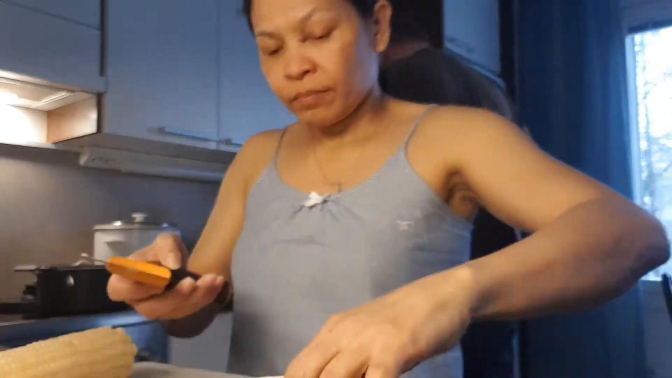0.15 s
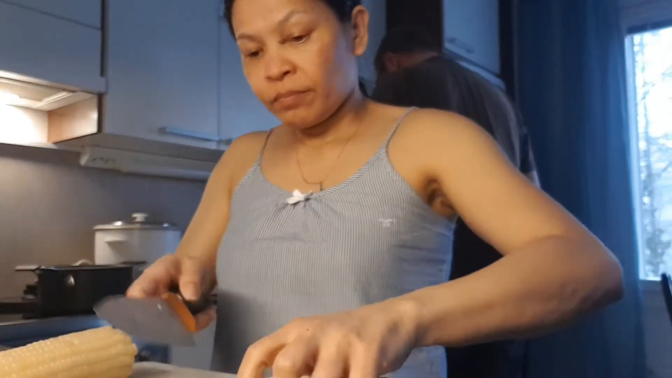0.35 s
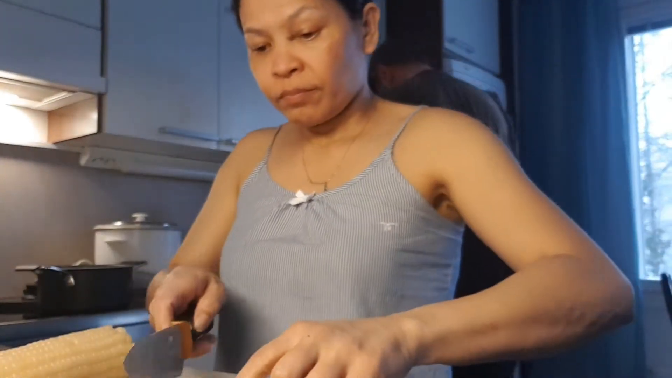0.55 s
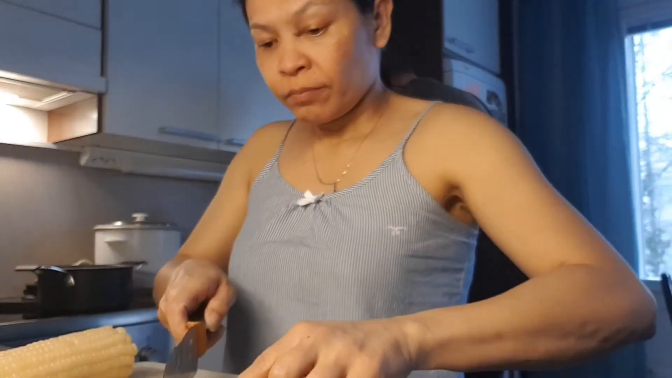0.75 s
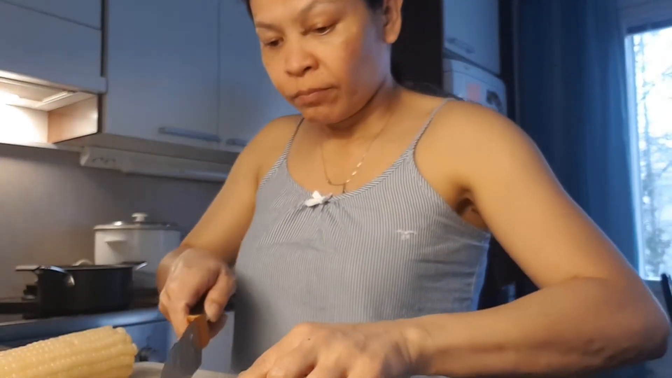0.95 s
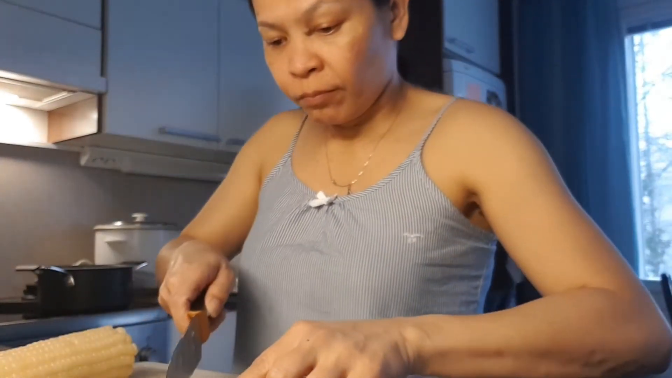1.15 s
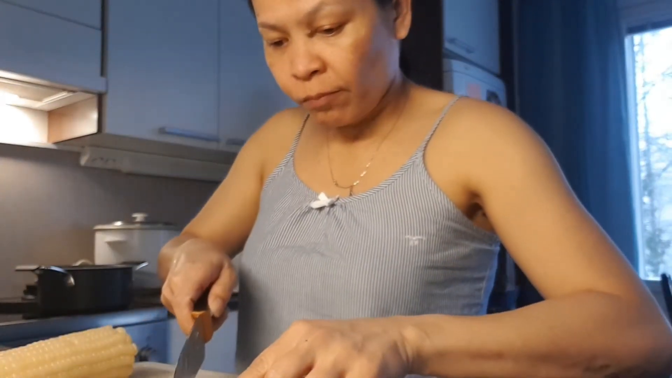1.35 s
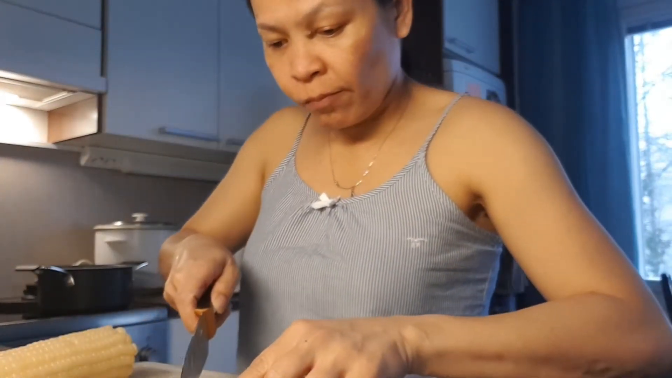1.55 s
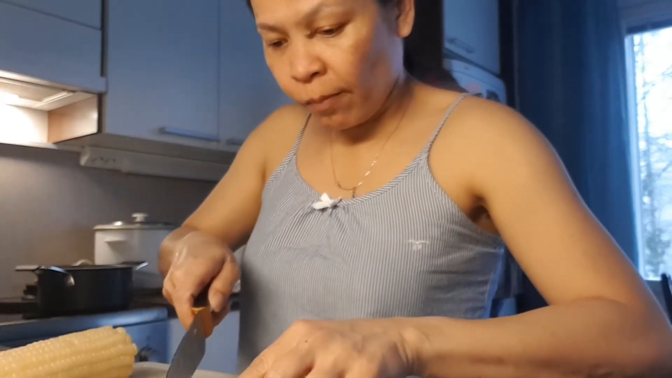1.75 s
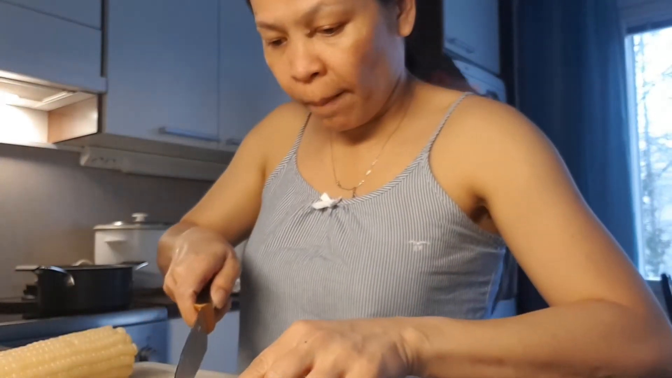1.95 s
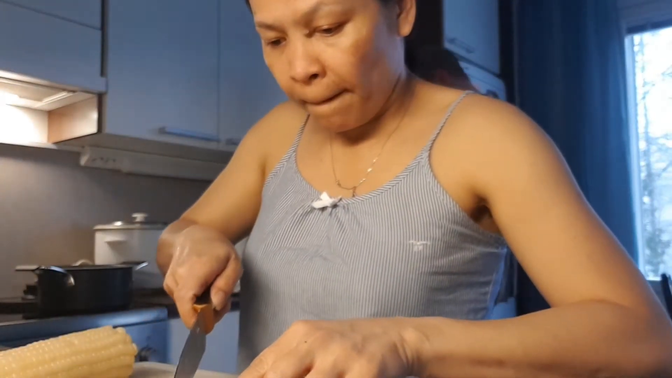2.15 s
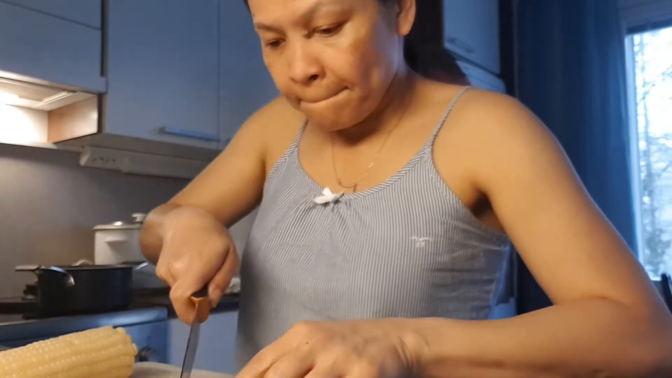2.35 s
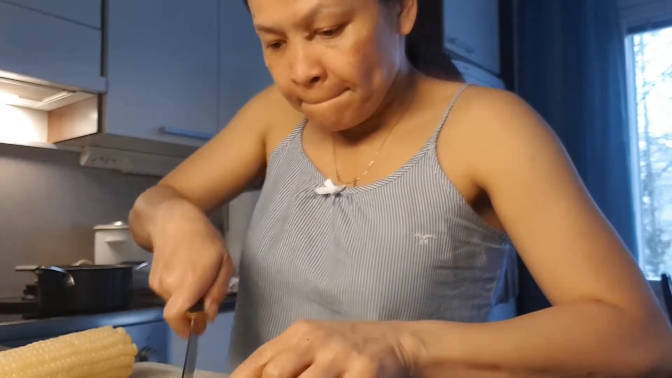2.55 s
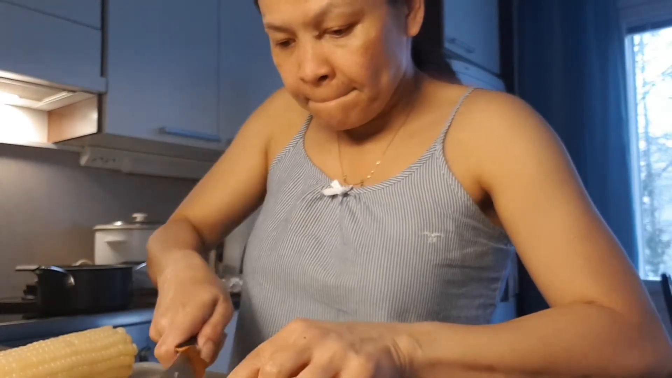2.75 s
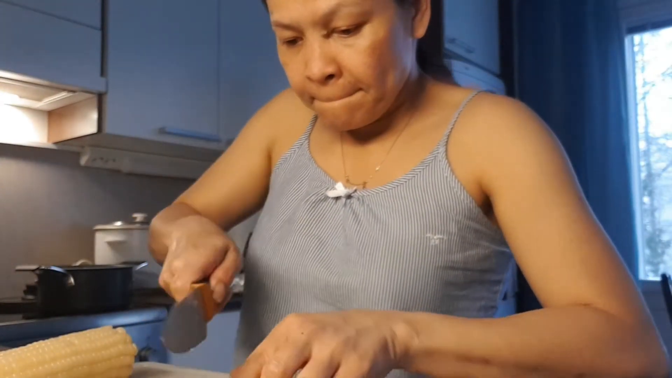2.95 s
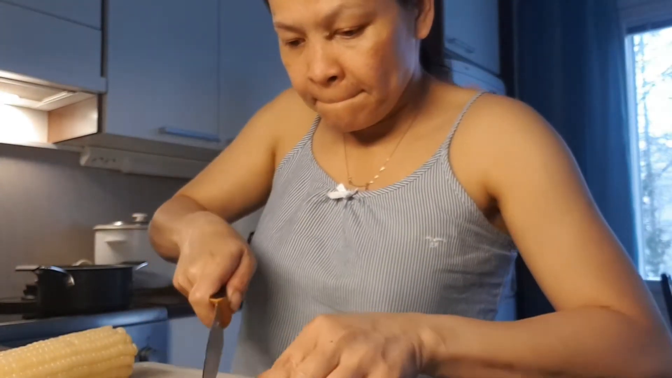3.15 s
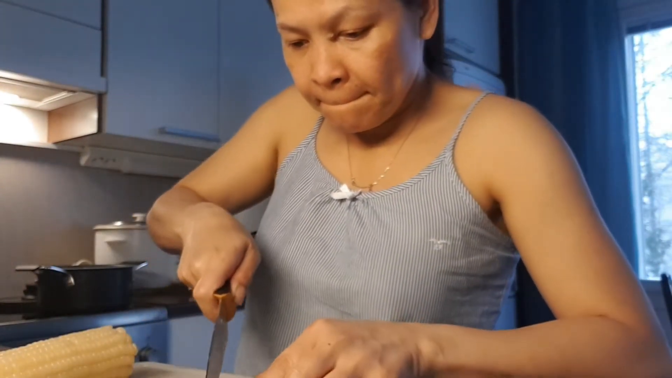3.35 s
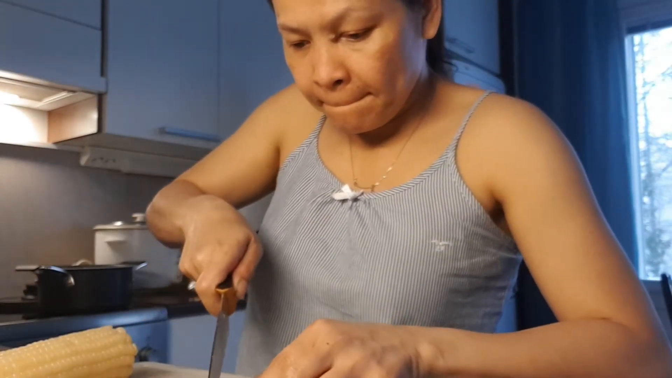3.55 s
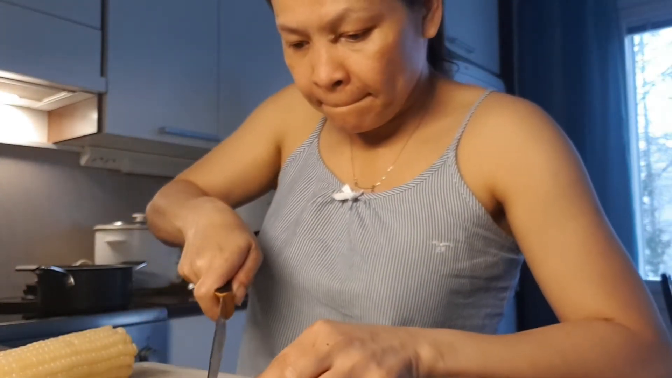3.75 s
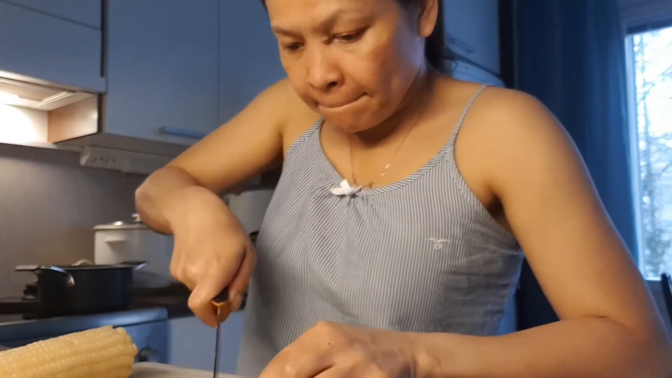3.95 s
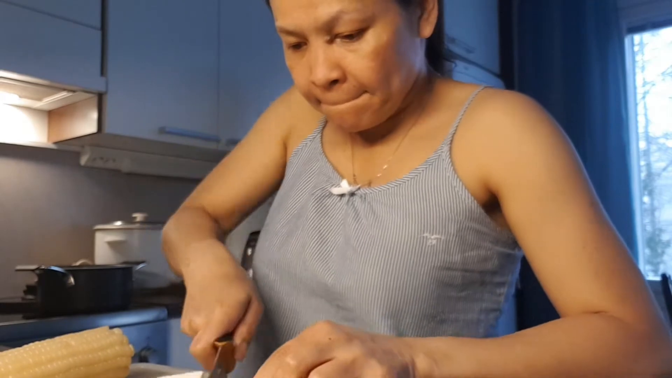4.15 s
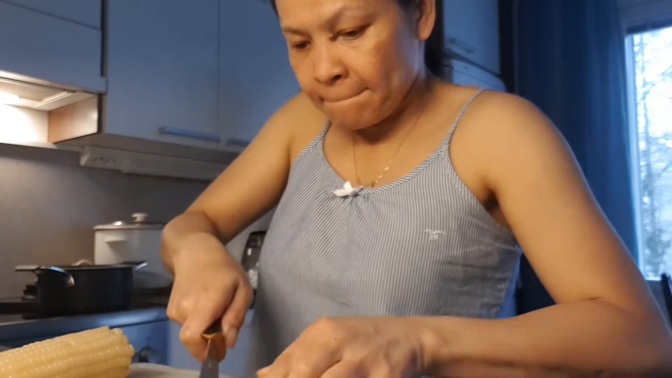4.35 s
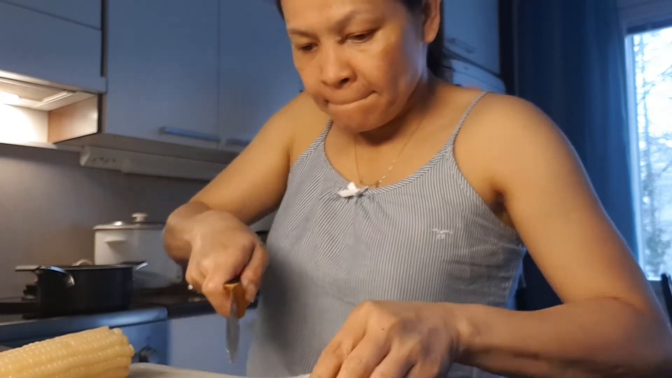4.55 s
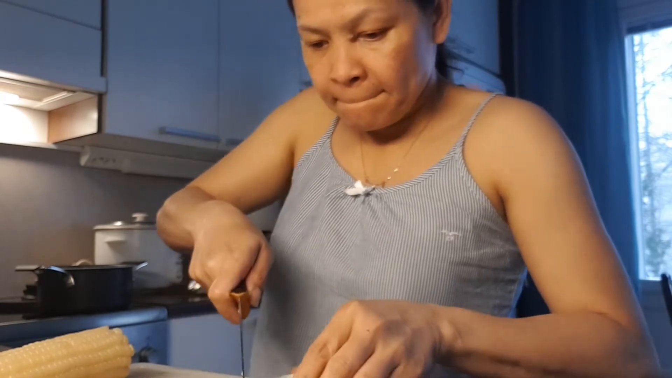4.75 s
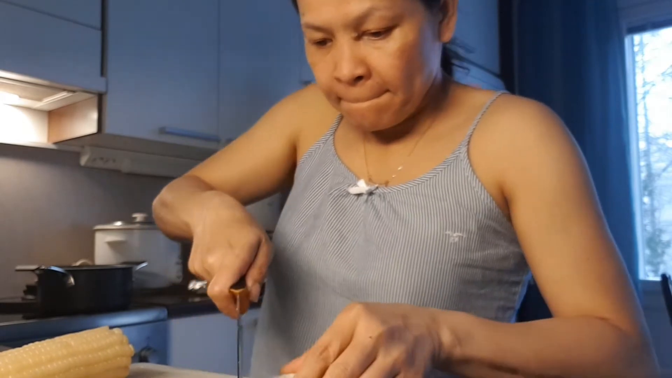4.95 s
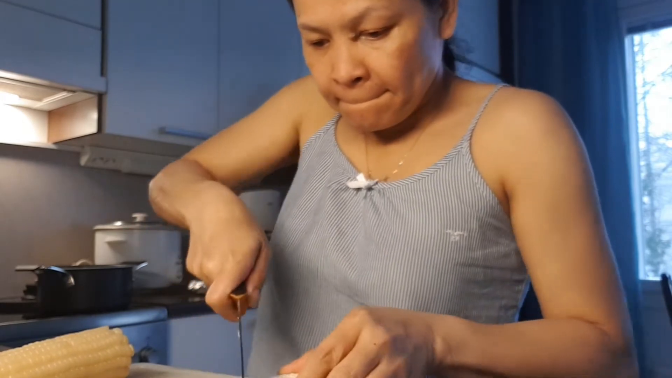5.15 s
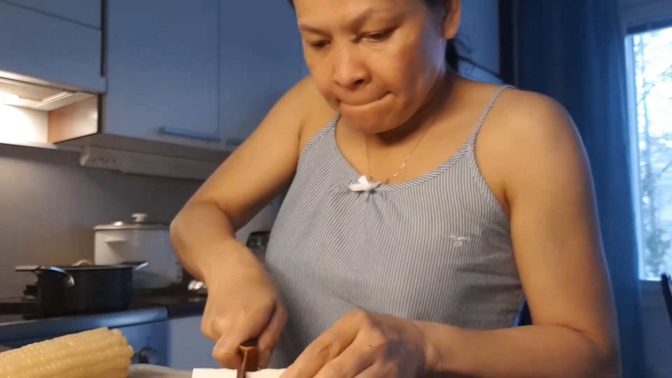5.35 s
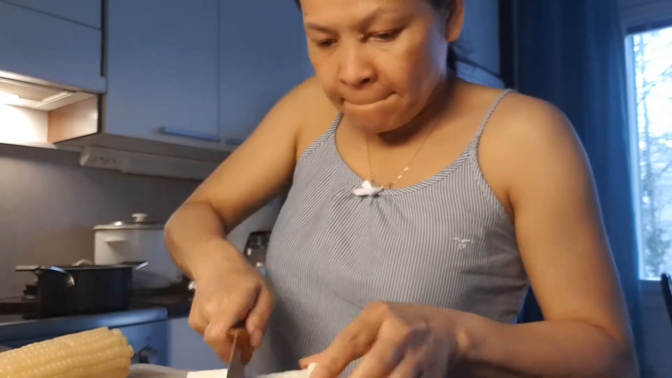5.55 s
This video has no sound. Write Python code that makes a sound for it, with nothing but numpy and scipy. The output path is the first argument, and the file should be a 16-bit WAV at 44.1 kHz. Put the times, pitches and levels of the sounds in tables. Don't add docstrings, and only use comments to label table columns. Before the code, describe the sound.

Close, dry kitchen cutting: light taps and soft worktop thuds, then rasping fibre-tearing strokes swelling and fading irregularly. The blade breaks through and cracks on the wooden board, saws harder, then breaks through again with a rattling burst of knocks. Near silence with faint brushing follows, then one last chop. A small room echoes briefly; an appliance hums beneath.

```python
import sys
import numpy as np
from scipy import signal
from scipy.fft import rfft, irfft, next_fast_len
from scipy.io import wavfile
from scipy.ndimage import uniform_filter1d

SR = 44100
rng = np.random.default_rng(int(sys.argv[2]) if len(sys.argv) > 2 else 0)


def gain_from_decibels(decibels):
    exponent = np.asarray(decibels, float) / 20
    return 10 ** exponent


def persist_wave(psi):
    counts = np.round(np.clip(psi, -1, 1) * 32767).astype(np.int16)
    wavfile.write(sys.argv[1], SR, np.atleast_2d(counts).T)


N = 250796

# (start [s], swell [s], fade [s], edge hiss [dB], root body share [dB])
STROKES = [(.632, .02, .03, -53, 4), (.643, 0.03, 0.51, -45, 5.5), (.785, 0.021, 0.026, -35.5, -9),
           (.8, 0.043, 0.13, -44, -6), (1.025, 0.025, 0.25, -46.5, -9), (1.185, 0.037, 0.05, -44, -2),
           (1.3, 0.055, 0.21, -60, 7.5), (1.371, 0.002, 0.068, -49, -11), (1.41, 0.0066, 0.079, -46, -9),
           (1.604, .002, .02, -55, -8), (1.602, 0.055, 0.12, -53.5, -14), (1.748, 0.0082, 0.1, -49, 1),
           (1.84, 0.071, 0.15, -42.5, -2.5), (1.93, 0.065, 0.12, -44, 0.5),
           (2.146, 0.0067, 0.043, -54.5, -4), (2.182, 0.0033, 0.076, -52, -8),
           (2.317, 0.012, 0.1, -58, 1.5), (2.36, 0.0065, 0.051, -58.5, -1), (2.42, 0.005, 0.09, -55.5, 0),
           (2.446, .002, .035, -46, 0), (2.446, 0.13, 0.16, -37.5, -1), (2.62, 0.059, 0.3, -41, -1),
           (2.75, 0.069, 0.091, -40, -2), (2.97, 0.049, 0.066, -49.5, -4), (3.13, 0.09, 0.42, -50.5, -2.5),
           (3.29, 0.024, 0.23, -47, -2), (3.46, 0.041, 0.14, -41.5, 0), (3.5, 0.061, 0.079, -41, -5),
           (3.63, 0.074, 0.19, -40.5, 0), (3.8, 0.13, 0.12, -37.5, -0.5)]
# (start [s], swell [s], fade [s], edge hiss [dB], body share [dB])
BRUSHES = [(0, 0.0032, 0.37, -77.5, 10), (.1, 0.022, 0.11, -72, 13), (.19, 0.063, 0.16, -66.5, 4),
           (.34, 0.053, 0.16, -67, 2), (.55, 0.014, 0.25, -75, 21), (1.51, 0.032, 0.17, -63.5, -15),
           (2.598, 0.017, 0.0052, -30, 10), (4.108, .012, 0.033, -55, -13), (4.055, 0.0081, .015, -54, 6),
           (4.122, 0.0068, 0.013, -49, -12), (4.132, 0.0019, 0.022, -33, 1.5),
           (4.143, 0.006, 0.004, -32, 4), (4.163, .004, 0.045, -48, 4), (4.195, .005, 0.031, -49, -4),
           (4.219, 0.028, 0.26, -59.5, 8.5), (4.51, 0.018, 0.039, -67, -11),
           (4.575, 0.048, 0.038, -69, -15.5), (4.69, 0.051, 0.049, -79.5, -9),
           (4.775, 0.016, 0.066, -76.5, -15.5), (4.869, 0.06, 0.042, -79, -10.5),
           (4.9, 0.075, .3, -90.5, 2), (5.12, .01, .03, -89, 6.5), (5.18, 0.007, 0.019, -66.5, -0.5),
           (5.202, 0.0021, 0.014, -64.5, -1), (5.22, .01, 0.097, -85.5, -2), (5.284, .004, 0.0095, -67, -2),
           (5.292, .002, 0.013, -56, 0), (5.3, 0.0033, 0.0057, -49, 3), (5.309, 0.008, 0.0027, -36, -5),
           (5.319, .002, 0.0035, -33.5, 9), (5.33, 0.0091, 0.14, -69.5, -1),
           (5.565, 0.017, 0.055, -85.5, 17)]
# (frequency [Hz], density [dB per Hz])
FIBRE_SPECTRUM = [(180, -40.5), (300, -18.5), (510, -3.5), (573, -12), (759, -10.5), (825, -8.5),
                  (1210, -8), (1740, -5), (2310, -6), (4480, -2.5), (6670, -5), (8700, -11.5), (12900, -6),
                  (15800, -13.5)]
# (time [s], peak [dB], room share [dB], brightness [dB per octave], left-right [dB])
KNOCKS = [(2.612, 0, -11.5, -2, 0), (2.6198, -10, -3.5, -2.5, 6), (2.629, -14, -10.5, -8.5, -2),
          (4.159, 2.5, -3.5, 2, 3), (4.163, -18, -7, 1, 0), (4.17, -9, -6.5, -2, 4.5),
          (4.177, -3, -1, 1.5, 8), (4.181, -9.5, -7.5, 4, 0), (4.185, -3.5, -8.5, -4, 9.5),
          (4.191, -11, -2, -4, -1.5), (4.197, -11, 0.5, 2, 3), (5.3195, -2, -11, 5, -1),
          (5.323, -12, -11, -1, -1), (5.328, -22.5, -4.5, 2, 3), (5.354, -25.5, -9, -1, 0)]
# (frequency [Hz], t60 [s], first spot [dB], second spot [dB], third spot [dB])
BOARD_MODES = [(478.6, 0.03, -14, -12.5, -15), (840, .04, -9, -12, -16), (1100, .035, -23, -11, -15),
               (1275, .025, -2.5, -9, -16), (1445, .045, 2, -1, 0.5), (1732, .017, -16, -3, -3),
               (2081, .02, -9, -6, -24), (2480, 0.0088, -17.5, -6.5, -20.5), (2797, .01, -7.5, -6.5, -4),
               (3350, .008, -6, -10, -22), (3883, .008, -11.5, -17.5, -15),
               (4680, 0.0037, -21.5, -22.5, -31.5), (5340, 0.0035, -22, -24, -15.5),
               (6240, 0.0043, -21.5, -22, -23.5)]
SPOT_ENDS_S = [3, 5]
# (frequency [Hz], lead [rad])
EAR_LEAD = [(490, -2.5), (830, -1.1), (1100, -1.7), (1300, 0.6), (1765, 0.2), (2200, 3), (2830, 0.5),
            (3500, -0.35)]
# (time [s], peak [dB], pitch [Hz], left-right [dB])
TICKS = [(0.094, -39.5, 1790, 9), (0.1196, -29.5, 1840, 9.5), (0.136, -41, 2600, 1), (0.145, -36, 1770, 10),
         (0.158, -30, 1690, 2), (0.2983, -41, 991, 12), (0.1198, -35, 850, 6), (0.154, -38, 850, 2),
         (0.562, -47, 1900, 5), (0.568, -42, 1000, 4), (0.578, -44, 1430, 6), (0.799, -18.5, 3350, 5),
         (1.222, -32.5, 4240, 21), (1.3717, -33, 6100, 9), (1.413, -41, 3430, 11), (1.605, -40, 6070, 9),
         (1.6447, -32, 1100, -9), (2.523, -29.5, 3240, 10.5), (4.0778, -24, 1502, 5.5),
         (4.1116, -21, 3510, 5), (4.5997, -55, 1660, -3), (4.6244, -66.5, 3200, -4),
         (5.188, -49.5, 3510, -3.5), (5.205, -46, 3010, -1)]
# (time
# [s], peak [dB], pitch [Hz], left-right [dB], t60 [s])
PATS = [(0.298, -35, 400, -3, 0.1), (2.614, -21.5, 325, -1.5, 0.15), (0.59, -33, 330, 2.5, 0.04),
        (0.784, -25.5, 520, -1.5, 0.048), (1.645, -29, 430, -5, 0.055), (1.654, -33, 320, -4, 0.053),
        (1.6445, -29, 760, 5, 0.09), (1.6455, -28.5, 1400, 6, 0.11), (1.663, -32, 1600, 6, 0.064),
        (1.676, -34, 2700, 4, 0.045), (1.695, -40, 910, 9, 0.042), (1.679, -28, 390, 0, 0.087),
        (1.66, -35, 350, -2, 0.037), (4.165, -23.5, 350, -7.5, 0.21), (2.455, -28.5, 320, -5, 0.1),
        (4.3, -38, 1330, 4, 0.0301), (3.958, -29.5, 3100, 16.5, 0.036), (4.164, -13.5, 2300, 3, .12),
        (4.18, -11.5, 2050, 4, .16), (4.235, -22.5, 2050, 4, .1), (4.19, -18.5, 3800, 4, 0.098),
        (5.321, -24.5, 3700, 0.5, 0.054), (0.549, -35, 260, -1.5, .1), (0.163, -42, 3000, 4, 0.024)]
# (time [s], peak [dB], pitch [Hz], left-right [dB])
SNAPS = [(0.295, -45, 3530, 9), (0.643, -32, 2840, 8), (1.654, -32.5, 2600, 9), (4.133, -22, 4340, 4),
         (4.149, -16.5, 2770, 4.5), (5.2918, -47, 2920, -4), (5.301, -36, 4000, -3), (5.308, -38, 1590, -4),
         (4.165, -15, 3400, 4), (4.173, -12, 2200, 1.5), (4.183, -20, 6000, 2), (4.203, -15, 2790, 2)]
# (time [s], peak [dB], pitch [Hz])
THUDS = [(0.094, -29, 142), (0.295, -36, 179), (0.309, -54, 175), (0.465, -31.5, 169), (0.545, -28, 157),
         (0.562, -34, 140), (0.581, -25.5, 172), (0.594, -30.5, 149), (0.786, -25.5, 196),
         (1.653, -24.5, 203), (1.704, -28, 190), (1.721, -35, 119), (1.739, -35, 131), (2.248, -44, 185),
         (2.365, -22, 167), (2.452, -22.5, 172.5), (2.499, -25.5, 169), (2.608, -15.5, 177),
         (2.679, -25.5, 151), (3.247, -32.5, 163), (3.673, -35.5, 160), (3.863, -26, 161),
         (3.927, -19, 165), (3.952, -28, 163), (3.975, -31.5, 176), (4.032, -36, 170), (4.058, -35, 170),
         (4.111, -30, 191), (4.132, -27.5, 197), (4.163, -14.5, 169.7), (4.808, -48.5, 147),
         (5.129, -44.5, 167), (5.185, -40.5, 157.7), (5.288, -36.5, 165), (5.316, -22, 168.3),
         (5.529, -45, 227)]
# (time [s], peak [dB], pitch [Hz], length [s])
BUMPS = [(0.564, -31, 47, 0.07), (0.601, -26, 54.3, 0.06), (1.674, -27.5, 59, 0.054),
         (1.758, -43, 54, 0.06), (3.948, -53, 80.5, 0.07), (3.929, -33.5, 530, .03),
         (3.954, -35, 498, 0.023), (0.1185, -33.5, 1760, 0.0079), (0.156, -39, 1740, 0.01),
         (1.645, -30.5, 822, 0.016), (1.683, -20.5, 200, .009), (1.695, -20.5, 140, 0.015),
         (1.721, -23, 151, .012), (1.738, -24, 200, .012), (4.112, -20, 189, .014), (1.828, -30, 190, .015),
         (0.301, -24, 200, .012)]
# (struck [s], frequency [Hz], level [dB], t60 [s], damped [s])
METAL = [(-.05, 1976, -61, 2.5, .5), (-.05, 2094, -61, 4.0, .56), (-.05, 1770, -62, .6, .2),
         (.2, 985, -55, 3.0, .45), (.255, 985, -53, .3, .37)]
# (frequency [Hz], level [dB])
HUM = [
    (49.8, -1.5),
    (100, -8.5),
    (150, -8),
    (201, -2),
]
# (frequency [Hz], density [dB per Hz])
RUMBLE_SPECTRUM = [(12, -35.5), (20, -23), (43, -12), (86, -8.5), (136, -1), (195, -0.5), (251, -7),
                   (301, -10.5), (387, -15), (481, -16), (715, -24.5), (1050, -34.5), (1500, -29.5),
                   (2000, -36.5), (2500, -47.5), (6000, -59.5)]
# (time [s], level [dB])
RECORDER_GAIN = [(0, -1.5), (.7, 4), (1.2, -0.5), (2.4, -4.5), (2.7, 0), (3.0, -3.5), (3.8, -3.5),
                 (4.15, -12), (4.6, -17.5), (5.3, -23.5), (5.69, -14)]
# (time [s], level [dB])
ECHO_GAIN = [(0, 3.5), (4.2, 1), (4.35, 2.5), (4.5, -5), (5.3, -3), (5.69, 16.5)]
# (frequency [Hz], t60 [s])
ROOM_T60 = [(100, 0.47), (500, 0.4), (1500, 0.39), (4000, 0.34), (8000, 0.31), (15000, 0.16)]
# (frequency [Hz], level [dB])
ECHO_COLOUR = [(300, -1.5), (500, 0), (615, -15.5), (790, 1), (1500, -3), (2200, -1.5), (2800, 1),
               (3600, 1.5), (5000, -2)]
# (frequency [Hz], coherence [0 to 1])
LIKENESS = [(60, 0.91), (180, 1), (550, 0.029), (1650, 0.2), (4970, 0.063), (15000, 0.075)]
# (frequency [Hz], level [dB])
LEAN = [(60, -2.5), (150, 0.5), (380, -3), (950, 6), (2380, 3), (5980, 6.5), (15000, 0)]

BITE_DB, FADE_DB, FADE_CURVE, BODY_FADE_RATIO = -12.5, -14, 1.16, 0.98
TICK_T60_S, THUD_S = 0.014, 0.029
HUM_DB, RUMBLE_DB, HISS_DB = -49, -46.5, -90
STIR_DB, STIR_T60_S = -16.5, 0.56
CUTOFF_HZ = 15800


def at_hz(points, hz):
    table_hz, values = np.transpose(points)
    return np.interp(np.log(np.maximum(hz, 1)), np.log(table_hz), values)


def rms_one(x):
    return x / np.sqrt(np.mean(x ** 2) + 1e-20)


def drift(rate):
    r = np.exp(-80 * np.pi * rate / SR)
    slow = signal.lfilter([1], [1, -2 * r, r * r], rng.standard_normal(N // 40 + 2002))
    slow = slow[2000:]
    return np.interp(np.arange(N) / 40, np.arange(len(slow)), rms_one(slow))


def stereo_colour(pair, spectrum):
    size = next_fast_len(N)
    hz = np.arange(size // 2 + 1) * SR / size
    alike = np.clip(at_hz(LIKENESS, hz), 0, 1)
    mid, side = rfft(pair, size) * gain_from_decibels(at_hz(spectrum, hz))
    sides = np.array([[1], [-1]])
    ears = np.sqrt(1 + alike) * mid + sides * np.sqrt(1 - alike) * side
    ears = ears * gain_from_decibels(sides * at_hz(LEAN, hz) / 2)
    return irfft(ears, size)[:, :N]


def add(out, s, sound):
    at = round(s * SR)
    piece = sound[..., max(-at, 0):N - at]
    out[:, max(at, 0):max(at, 0) + piece.shape[-1]] += piece


def dying(hz, t60, t):
    return np.sin(2 * np.pi * hz * t) * gain_from_decibels(-60 * t / t60)


def background():
    t = np.arange(N) / SR
    gain = gain_from_decibels(np.interp(t, *np.transpose(RECORDER_GAIN)))
    pushes = np.zeros(N)
    for s, db, hz in THUDS:
        pushes[round(s * SR)] = gain_from_decibels(db + STIR_DB) ** 2
    stir = signal.lfilter([1], [1, -gain_from_decibels(-120 / STIR_T60_S / SR)], pushes)
    hum = sum(gain_from_decibels(db + 0.81 * drift(7.6)) * np.sin(2 * np.pi * hz * t) for hz, db in HUM)
    rumble = rms_one(stereo_colour(rng.standard_normal((2, N)), RUMBLE_SPECTRUM)) * gain_from_decibels(2 * drift(12))
    rumble = np.sqrt((gain * gain_from_decibels(RUMBLE_DB)) ** 2 + uniform_filter1d(stir, size=400)) * rumble
    hiss = gain_from_decibels(HISS_DB + 17) * rng.standard_normal((2, N))
    return gain * (gain_from_decibels(HUM_DB) * hum + hiss) + rumble


def room(x):
    t, tail = np.arange(SR // 2) / SR, 0
    edges = 90 * 2 ** np.arange(0, 7.6, .5)
    white = rng.standard_normal((2, 2, len(t)))
    for k, (low, high) in enumerate(zip(edges, edges[1:])):
        band_pass = signal.butter(2, [low, high], "band", fs=SR, output="sos")
        mid, side = signal.sosfilt(band_pass, white[k % 2])
        alike = np.clip(at_hz(LIKENESS, low), 0, 1)
        band = np.sqrt(1 + alike) * mid + np.sqrt(1 - alike) * side * [[1], [-1]]
        tail = tail + band * gain_from_decibels(-60 * t / at_hz(ROOM_T60, np.sqrt(low * high)))
    hz = np.arange(len(t) // 2 + 1) * SR / len(t)
    tail = irfft(rfft(tail) * gain_from_decibels(at_hz(ECHO_COLOUR, hz)), len(t))
    tail = tail * np.clip((t[-1] - t) / .1 - .1, 0, 1)
    tail = tail * np.clip(t / 0.0025, 0, 1)
    tail = rms_one(tail) / np.sqrt(len(t))
    return signal.fftconvolve(x, tail, axes=1)[:, :N]


def metal():
    out, t = np.zeros((2, N)), np.arange(SR) / SR
    for s, hz, db, t60, damped in METAL:
        line = dying(hz, t60, t) * gain_from_decibels(db + 1.5 * drift(30)[:SR]) * np.clip(t / .035, 0, 1)
        add(out, s, line * np.clip((damped - s - t) / 0.031, 0, 1) * [[1], [.6]])
    return out


def thuds():
    out, t = np.zeros((1, N)), np.arange(SR // 3) / SR
    for s, db, hz, length in [(*row, THUD_S) for row in THUDS] + BUMPS:
        u = t / max(length, .008)
        swell = np.minimum(6.7 * u, 1) * np.exp(-u ** 2)
        modes = np.sin(2 * np.pi * hz * t) + 0.38 * np.sin(2 * np.pi * 1.3 * hz * t)
        add(out, s, gain_from_decibels(db - 5.5) * swell * modes)
    return signal.sosfilt(signal.butter(4, 34, "high", fs=SR, output="sos"), out)


def ticks():
    out, t = np.zeros((2, N)), np.arange(SR // 10) / SR
    rows = [(*row, TICK_T60_S) for row in TICKS] + PATS + [(*row, TICK_T60_S) for row in SNAPS]
    luck = rng.standard_normal((len(rows), 2, len(t)))
    for (s, db, hz, pan_db, t60), grit in zip(rows, luck):
        band = signal.butter(1, [hz / 1.87, min(hz * 1.32, 16000)], "band", fs=SR)
        burst = grit * gain_from_decibels(-60 * t / max(t60, .004)) * np.minimum(t / 0.00084, 1)
        tick = signal.lfilter(*band, signal.lfilter(*band, burst))
        pan = gain_from_decibels(np.array([[.5], [-.5]]) * pan_db)
        add(out, s, gain_from_decibels(db) * tick / np.abs(tick).max() * pan)
    return out


def knocks(contact_s, delay_s, chatter_db, chatter_s, crack, splinter_db):
    dry, wet, t = np.zeros((2, N)), np.zeros((2, N)), np.arange(SR // 12) / SR
    hz, t60, *spots_db = np.transpose(BOARD_MODES)[:, :, None]
    lead = at_hz(EAR_LEAD, hz) / 2
    luck = rng.standard_normal((len(KNOCKS), 3, len(BOARD_MODES), 1))
    shaking = rng.standard_normal((len(KNOCKS), 2, len(t)))
    high_pass = signal.butter(2, 420, "high", fs=SR)
    notch = signal.iirnotch(620, 6.5, fs=SR)
    splinter_band = signal.butter(2, [2100, 6500], "band", fs=SR)
    ring = gain_from_decibels(-60 * t / np.clip(t60, .003, 26 / hz))
    fade = ring + crack * gain_from_decibels(-60 * t / .004)
    for (s, db, room_db, tilt_db, pan_db), (detune, left, right), chatter in zip(KNOCKS, luck, shaking):
        mode_db = spots_db[np.searchsorted(SPOT_ENDS_S, s)] + tilt_db * np.log2(hz / 1400)
        rise = (1 - np.exp(-t / contact_s)) * fade * gain_from_decibels(mode_db)
        turns = 2 * np.pi * hz * (1 + 0.012 * detune) * t
        lean = gain_from_decibels(pan_db / 2)
        at_left = (lean * rise * np.sin(turns + lead + .35 * left)).sum(0)
        at_right = (rise / lean * np.sin(turns - lead + .35 * right)).sum(0)
        blow = np.array([at_left, at_right])
        rattle = signal.fftconvolve(blow, chatter * gain_from_decibels(-60 * t / chatter_s), axes=1)[:, :len(t)]
        blow = blow + gain_from_decibels(chatter_db) * rattle
        blow = signal.lfilter(*notch, signal.lfilter(*high_pass, blow))
        blow = -gain_from_decibels(db + 0.32) * blow / np.abs(blow).max()
        splinters = signal.lfilter(*splinter_band, chatter[::-1] * gain_from_decibels(-60 * t / 0.018))
        blow = blow + gain_from_decibels(db + splinter_db) * splinters * [[lean], [1 / lean]]
        add(dry, s + delay_s, blow)
        add(wet, s + delay_s, gain_from_decibels(room_db + 3) * blow * np.exp(-t / .0017))
    return dry, wet


def stroke_levels(rows):
    t = np.arange(0, N, 16) / SR
    power = np.zeros((2, len(t)))
    for s, swell, fade, db, body_db in rows:
        swell = max(swell, .001)
        past = (t - s - swell) / (max(fade, .002) * np.array([[1], [BODY_FADE_RATIO]]))
        bite_db = BITE_DB * np.clip(1 - (t - s) / swell, 0, 1)
        shape_db = bite_db + FADE_DB * np.clip(past, 0, 9) ** FADE_CURVE
        power += (t >= s) * gain_from_decibels(db + shape_db + np.array([[0], [body_db]])) ** 2
    return np.repeat(np.sqrt(power), 16, axis=1)[:, :N]


def sawing(grains_per_s, spread_db, split_hz):
    edge, body = stroke_levels(STROKES + BRUSHES)
    sizes = gain_from_decibels(spread_db * np.minimum(rng.exponential(1, N), 4))
    sizes = sizes * (rng.random(N) < grains_per_s / SR)
    clicks = (sizes + .5) * rng.standard_normal((2, N)) * gain_from_decibels(drift(28))
    torn = stereo_colour(clicks, FIBRE_SPECTRUM)
    top_band = signal.butter(4, [7000, 15000], "band", fs=SR, output="sos")
    top = signal.sosfilt(top_band, torn.mean(0))
    torn = torn / np.sqrt(np.mean(top ** 2))
    low = signal.sosfiltfilt(signal.butter(1, split_hz, fs=SR, output="sos"), torn)
    return uniform_filter1d(body, size=60) * low + uniform_filter1d(edge, size=60) * (torn - low)


def scene():
    blows, blows_wet = knocks(contact_s=0.00058, delay_s=0.00084, chatter_db=-20, chatter_s=0.036,
                              crack=0.63, splinter_db=-21.5)
    small, low = ticks(), thuds()
    saw = sawing(grains_per_s=3000, spread_db=2.5, split_hz=2600)
    wet = room(blows_wet + gain_from_decibels(-8) * small + gain_from_decibels(-20) * low + gain_from_decibels(-16) * saw)
    wet = wet * gain_from_decibels(np.interp(np.arange(N) / SR, *np.transpose(ECHO_GAIN)))
    return blows + small + low + saw + wet + background() + metal()


def roll_off(x):
    return signal.sosfilt(signal.butter(12, 15850, fs=SR, output="sos"), x)


def record(dry):
    rounded = 1.05 * np.tanh(dry / 1.05)
    mix = signal.sosfilt(signal.cheby2(12, 70, CUTOFF_HZ + 900, fs=SR, output="sos"), rounded)
    mix = signal.sosfilt(signal.butter(2, 24, "high", fs=SR, output="sos"), mix)
    return roll_off(mix)


dry = scene()
out = record(dry)
persist_wave(out)
```